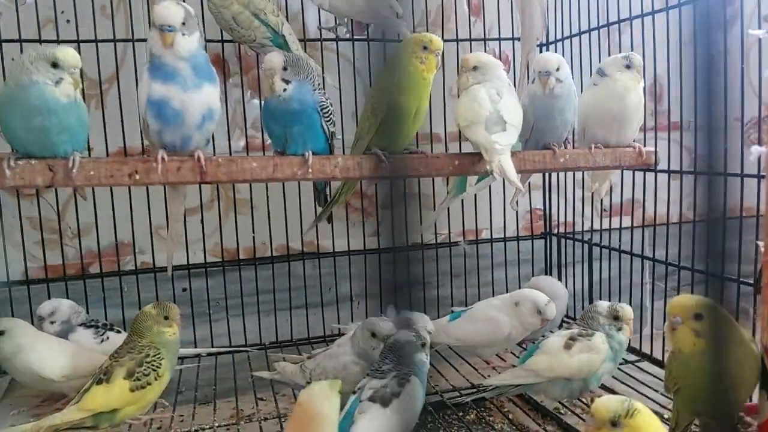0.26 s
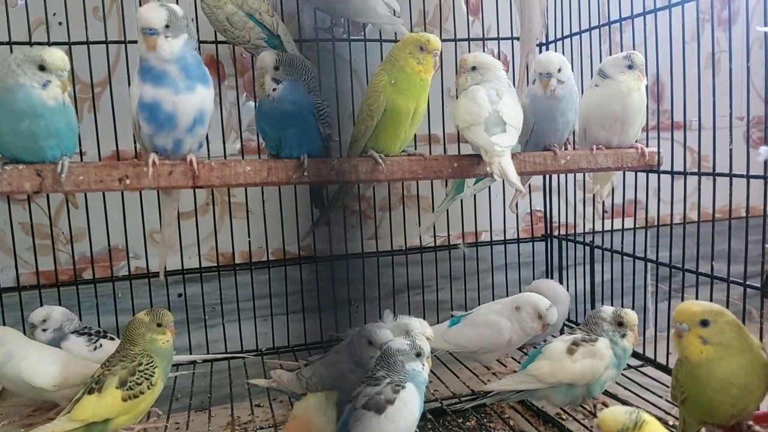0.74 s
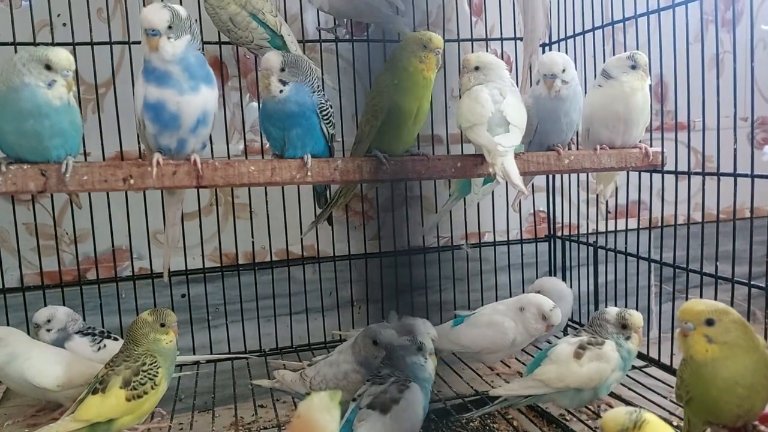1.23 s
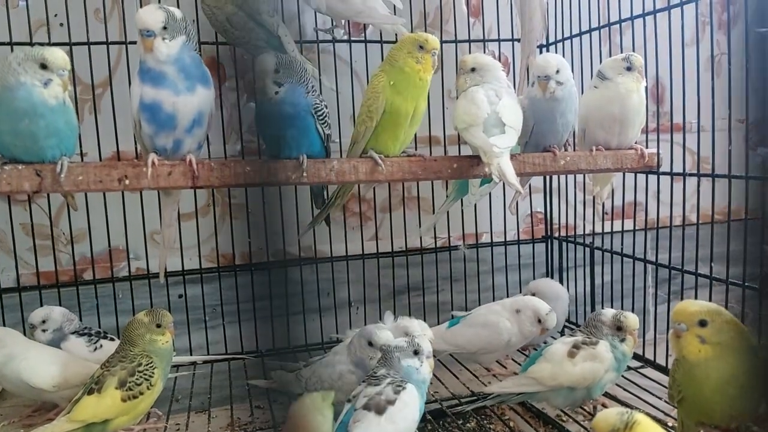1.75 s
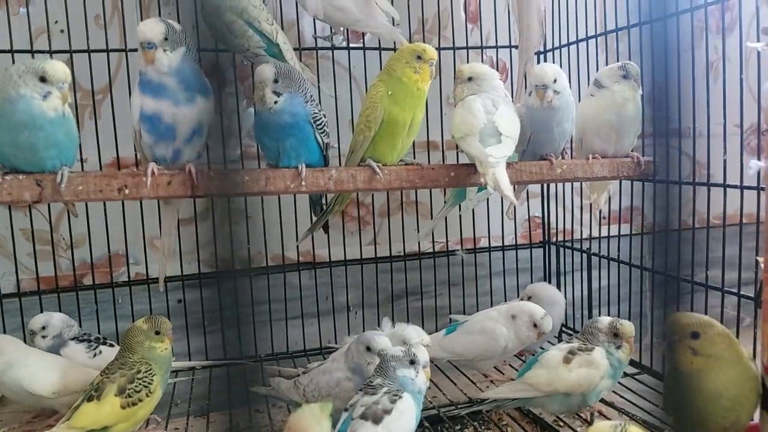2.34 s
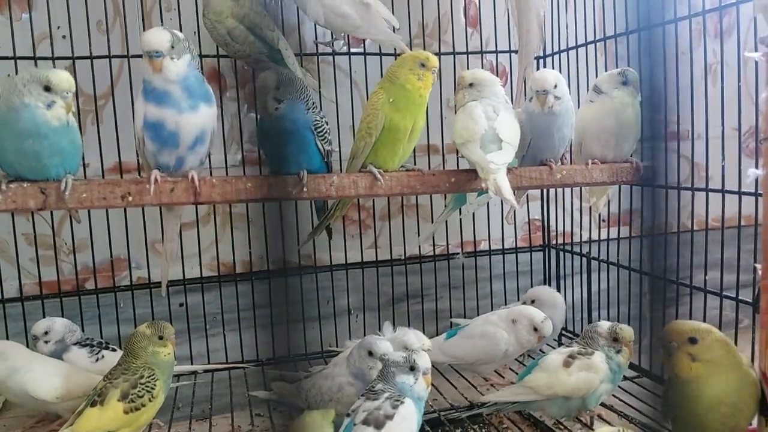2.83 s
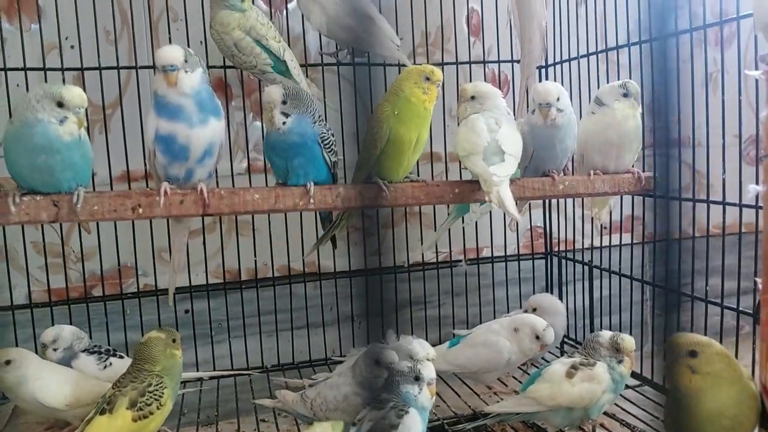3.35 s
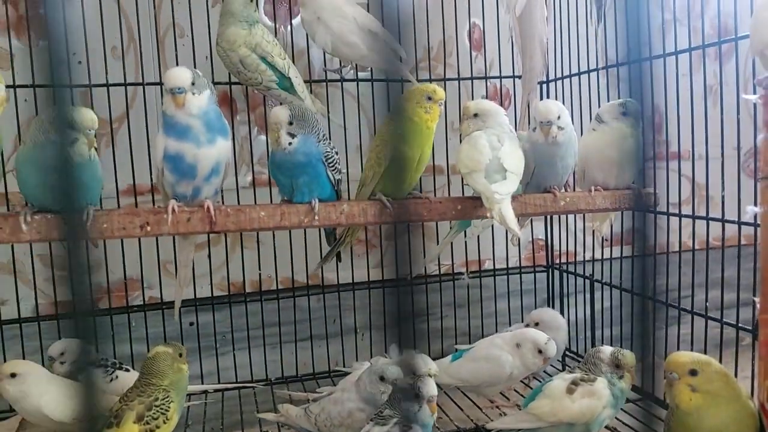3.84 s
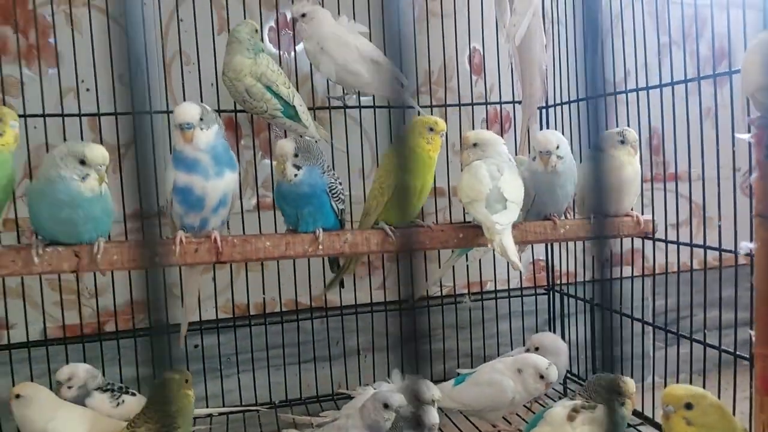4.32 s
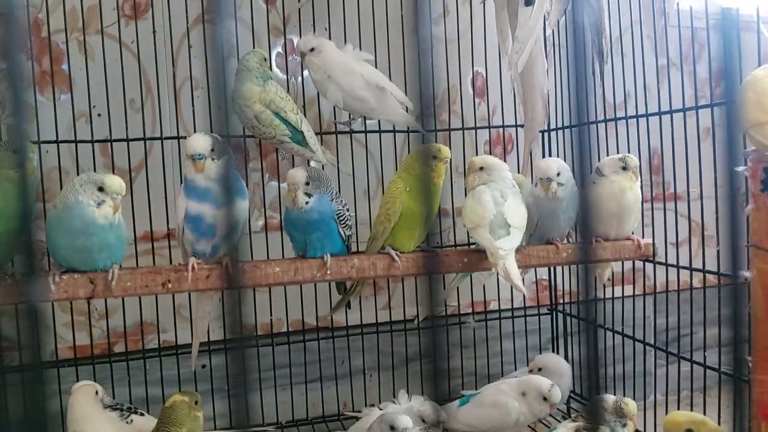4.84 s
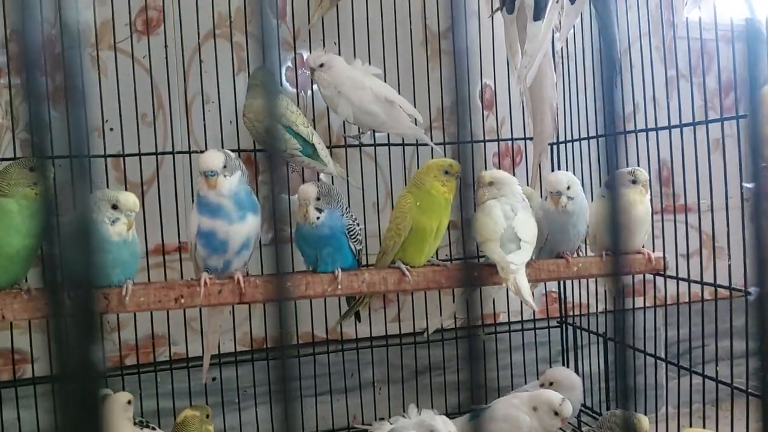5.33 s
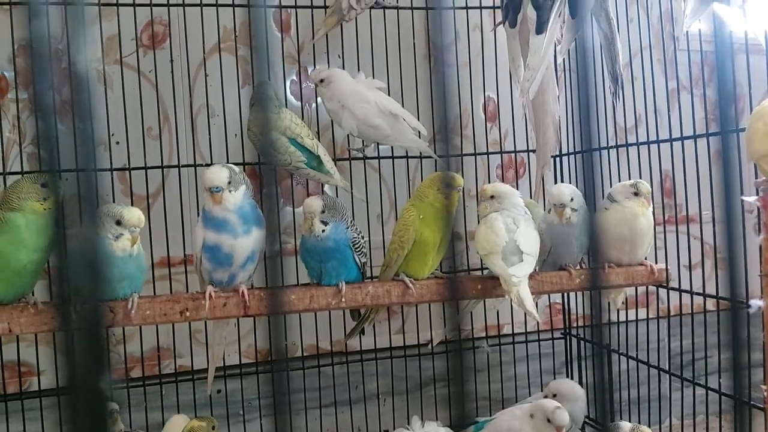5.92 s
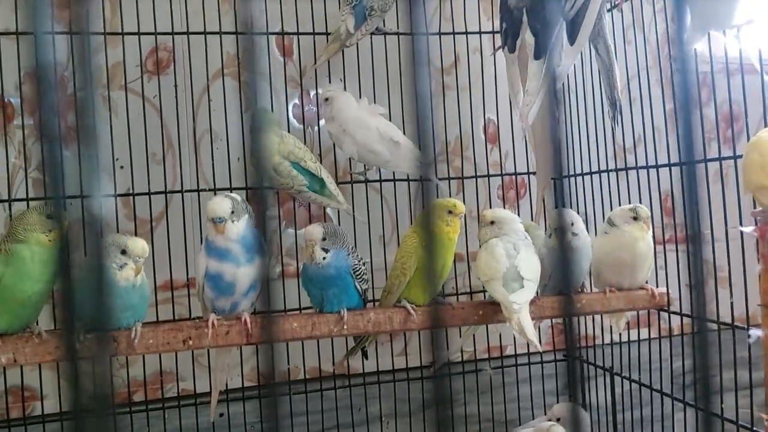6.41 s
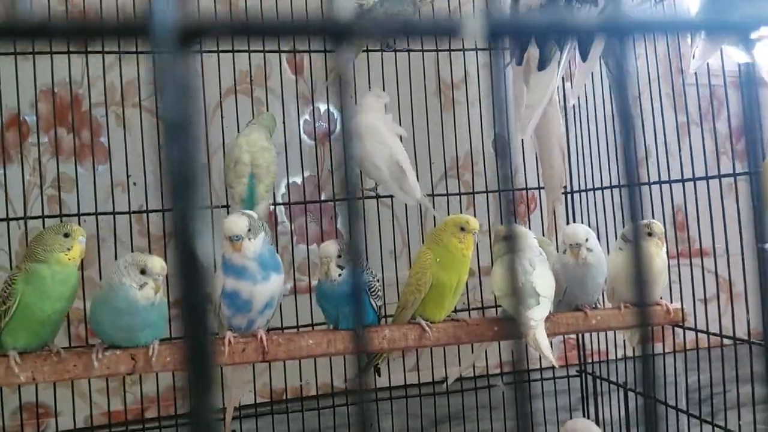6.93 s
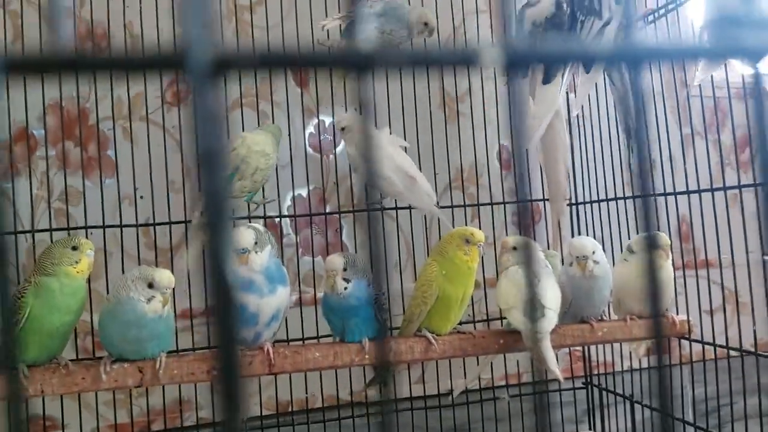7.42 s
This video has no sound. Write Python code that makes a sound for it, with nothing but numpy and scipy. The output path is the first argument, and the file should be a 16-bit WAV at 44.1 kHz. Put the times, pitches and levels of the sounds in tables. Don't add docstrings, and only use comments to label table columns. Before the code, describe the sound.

A small flock of parakeets indoors: sparse nasal calls, peeps and perch knocks, then bright close chirps, finishing with three piercing whistles.

```python
import sys
import numpy as np
from scipy import signal
from scipy.fft import rfft, irfft
from scipy.io import wavfile
from scipy.ndimage import uniform_filter1d, minimum_filter1d

SR = 44100
rng = np.random.default_rng(int(sys.argv[2]) if len(sys.argv) > 2 else 0)


def gain_from_db(level_db):
    decades = np.asarray(level_db, float) / 20
    return 10 ** decades


def transcribe(signal):
    frames = np.atleast_2d(signal).T
    limited = np.clip(frames, -1, 1)
    pcm = np.round(limited * 32767).astype(np.int16)
    wavfile.write(sys.argv[1], SR, pcm)


N = 338247
CUTOFF_HZ = 16400


def rms_one(x):
    return x / np.sqrt(np.mean(x ** 2) + 1e-20)


def at_hz(points, hz):
    table_hz, value = np.transpose(points)
    return np.interp(np.log(np.maximum(hz, 1)), np.log(table_hz), value)


def coloured(x, spectrum):
    size = x.shape[-1]
    gain = gain_from_db(at_hz(spectrum, np.fft.rfftfreq(size, 1 / SR)))
    return irfft(rfft(x) * gain, size)


def filtered(x, order, hz, kind):
    return signal.sosfilt(signal.butter(order, hz, kind, fs=SR, output="sos"), x)


def drift(hz):
    r = np.exp(-2 * np.pi * hz / SR)
    white = rng.standard_normal(N + SR)
    return rms_one(signal.lfilter([1], [1, -2 * r, r * r], white)[SR:])


def add_at(out, start_s, sound):
    at = round(start_s * SR)
    out[at:at + len(sound)] += sound[:N - at]


def bursts(times_s, peaks_db, lengths_s, rise_s):
    out, t = np.zeros(N), np.arange(SR // 2) / SR
    for start_s, db, length_s in zip(times_s, peaks_db, lengths_s):
        decay = np.exp(-t / max(length_s, 0.002))
        add_at(out, start_s, gain_from_db(db) * np.minimum(t / rise_s, 1) * decay)
    return out


def sing(notes, partials, wobble, flutter_db, flutter_hz, edge_s):
    out, waver = np.zeros(N), drift(flutter_hz)
    flutter = gain_from_db(flutter_db * drift(flutter_hz))
    air = rms_one(filtered(rng.standard_normal(N), 4, 2000, "high"))
    for rows in notes:
        s, *columns = np.transpose(rows)
        at = np.arange(max(int((s[0] - edge_s) * SR), 0), min(int((s[-1] + edge_s) * SR), N))
        t = at / SR
        hz, *levels_db = [np.interp(t, s, column) for column in columns]
        phase = 2 * np.pi * np.cumsum(hz * (1 + wobble * waver[at])) / SR
        stack, breath_db = partials(hz, *levels_db)
        tone = 0
        for k, db in stack:
            audible = k * hz < CUTOFF_HZ
            tone = tone + np.sqrt(2) * gain_from_db(db) * np.sin(k * phase + k * k) * audible
        edges = np.clip(np.minimum(t - s[0], s[-1] - t) / edge_s + 1, 0, 1) ** 2
        out[at] += edges * flutter[at] * (tone + gain_from_db(breath_db) * air[at])
    return out


def mottled(spectrum, lumps_db):
    shared, *own = rng.standard_normal((3, N))
    noise, out = coloured(0.58 * shared + np.array(own), spectrum), 0
    for low_hz in 25 * 2 ** np.arange(10):
        if at_hz(spectrum, 1.4 * low_hz) > -35:
            band = filtered(noise, 2, [low_hz, min(2 * low_hz, 20000)], "band")
            out = out + band * gain_from_db(lumps_db * drift(15.0))
    return rms_one(out)


def background():
    # frequency in Hz, level in dB per Hz.
    rumble_colour = [(12, -56), (20, -20.5), (59, 1), (173, -10.5), (242, 0), (387, -14.5), (449, -9.5),
                     (500, -17.5), (650, -53), (1100, -120)]
    rustle_colour = [(800, -47), (1400, -13.5), (2600, 2.5), (4200, 0.5), (5500, -10), (8000, -14),
                     (16000, -31)]
    stir_colour = [(300, -16), (500, -9), (1000, -7.5), (1600, -10.5), (2500, -17.5)]
    # time in seconds, level in dB.
    restless = [(0.0, -44.5), (0.45, -44.5), (0.7, -75), (1.52, -65.5), (2.4, -67.5), (2.65, -89),
                (2.8, -66.5), (3.35, -63), (4.31, -58.5), (4.59, -74), (4.78, -56), (5.5, -65.5),
                (6.15, -60.5), (6.34, -47), (6.9, -52), (7.24, -65), (7.67, -68)]
    # start in seconds, length in seconds, level in dB.
    shuffles = [
        (-.2, 0.73, -57),
        (1.3, 1.2, -73),
        (3.1, 1.27, -66.5),
        (5.0, 1.8, -67),
    ]
    rumble_db, stir_db, shuffle_edge_s = -68, -74.5, 0.06
    stops_s, fade_s, drop_db = 6.85, 0.27, -13
    t = np.arange(N) / SR
    fade_db = drop_db * np.clip((t - stops_s) / fade_s, 0, 1)
    rumble = gain_from_db(rumble_db + fade_db) * mottled(rumble_colour, lumps_db=4.5)
    stir_level = gain_from_db(stir_db + fade_db)
    for s, length_s, db in shuffles:
        inside_s = np.minimum(t - s, s + length_s - t)
        stir_level = stir_level + gain_from_db(db) * np.clip(inside_s / shuffle_edge_s + 1, 0, 1)
    stir = stir_level * mottled(stir_colour, lumps_db=4.0)
    rustle = gain_from_db(np.interp(t, *np.transpose(restless))) * mottled(rustle_colour, lumps_db=1.5)
    return (rumble + stir + rustle) * gain_from_db([[1.2], [4.8]])


def bleat_shape(s, length_s, hz, sag_hz_per_s, db, scoop_share):
    scoop_s, droop_share = 0.018, 0.98
    attack_s, attack_db, release_s, release_db = 0.017, -21, 0.03, -6.5
    t = np.arange(0, length_s, 0.004)
    going = np.clip(1 - (length_s - t) / release_s, 0, 1)
    scoop = 1 - (1 - scoop_share) * np.exp(-t / scoop_s)
    pitch_hz = (hz - sag_hz_per_s * t) * scoop * (1 - (1 - droop_share) * going)
    level_db = db + attack_db * np.clip(1 - t / attack_s, 0, 1) + release_db * going
    return np.transpose([s + t, pitch_hz, level_db])


def throaty(calls, throat, scoop_share):
    def partials(hz, db):
        stack = [(k, db + at_hz(throat, k * hz) - at_hz(throat, 2345)) for k in range(1, 26)]
        return stack, db - 13.5
    notes = [bleat_shape(*row, scoop_share) for row in calls]
    return sing(notes, partials, wobble=0.005, flutter_db=2.5, flutter_hz=40, edge_s=0.012)


def bleats():
    # start in seconds, length in seconds, pitch in Hz, sag in Hz per second, level in dB.
    calls = [(-.06, 0.18, 618.6, 150.5, -45.5), (.595, 0.1, 611, 264, -57.5), (.89, 0.17, 568.3, 94, -61),
             (1.03, .18, 578.6, -11, -55), (1.23, 0.095, 590.6, 8, -59.5), (1.68, 0.095, 586, 5, -62),
             (2.985, 0.21, 594.6, 19.5, -52), (3.595, 0.2, 595.7, 3, -51), (4.16, 0.24, 599.4, 19.5, -50.5),
             (5.0, 0.19, 598, 53, -49), (5.19, 0.11, 590, 6, -52.5), (7.44, 0.25, 584, -31, -75)]
    # frequency in Hz, gain in dB.
    throat = [(290, -42.5), (500, -35), (1190, -17.5), (1430, -20), (2330, -3.5), (2640, -17.5), (2920, -3),
              (4800, -7.5), (5860, -28.5), (9250, -32), (13200, -27), (15000, -41)]
    return throaty(calls, throat, scoop_share=0.73)


def chirp_shape(s, leap_s, opening_db, closing_db, octave_db, drops):
    end_s, drop_at_s, drop_s, jump_s = 0.038, 0.021, 0.006, 0.0026
    top_hz, settle_hz, drop_hz = 6910, 6300, 4792
    before_drop_db, low_octave_db, half_off_db = -18, -16.5, -45
    burst_s, climb_s = 0.5 * leap_s, 0.65 * leap_s
    jump_at_s = max(leap_s - jump_s, climb_s + 0.00085)
    # s, Hz, level dB, half-register dB, octave dB
    rows = [(0, 4915, opening_db - 16.5, -3.5, low_octave_db),
            (burst_s, 4546, opening_db - 6, -9, low_octave_db),
            (climb_s, 4989, opening_db, -18, low_octave_db),
            (jump_at_s, 5500, opening_db - 10, -18, octave_db)]
    if opening_db < -28:
        rows = [(t, hz, db, half_off_db, octave_db) for t, hz, db, *_ in rows]
    if drops:
        half_db = half_off_db
        clear = [(leap_s, top_hz, before_drop_db), (drop_at_s, top_hz, before_drop_db),
                 (drop_at_s + drop_s, drop_hz, 0), (end_s, drop_hz, 0)]
    else:
        half_db = -30.5
        clear = [(leap_s, top_hz, 0), (end_s, settle_hz, 0)]
    rows += [(t, hz, closing_db + db, half_db, octave_db) for t, hz, db in clear]
    return np.array(rows) + [s, 0, 0, 0, 0]


def chirps():
    # start in seconds, leap in seconds after it, opening, closing and octave levels in dB.
    high = [
        (-0.012, 0.033, -16, -22.5, -24),
        (4.604, 0.02, -13, -24.5, -0.5),
        (5.005, 0.02, -9, -21, -12),
        (5.559, 0.022, -17, -22.5, -4),
        (5.665, 0.02, -20.5, -25.5, -9),
        (6.159, 0.021, -19, -23, -10.5),
    ]
    dropping = [
        (0.335, 0.022, -15, -17.5, -16),
        (4.028, 0.011, -28, -19, -8.5),
    ]

    def partials(hz, db, half_db, octave_db):
        whole = [(1, db), (2, db + octave_db), (3, db + octave_db - 7.5)]
        halves = [(0.5, db + half_db), (1.5, db + half_db - 6.0), (2.5, db + half_db - 1)]
        return whole + halves, db + half_db + 2.5
    notes = [chirp_shape(*row, drops=False) for row in high]
    notes += [chirp_shape(*row, drops=True) for row in dropping]
    voice = sing(notes, partials, wobble=0.013, flutter_db=4.5, flutter_hz=403, edge_s=0.0015)
    return filtered(voice, 6, 1910, "high")


def squawks():
    # start in seconds, length in seconds, pitch in Hz, sag in Hz per second, level in dB.
    calls = [
        (.2, .135, 898, 763, -51),
        (3.265, .16, 893.4, 854, -51),
        (4.81, .17, 873.5, 485, -53),
    ]
    # frequency in Hz, gain in dB.
    throat = [(410, -45), (700, -22.5), (2000, -4), (2460, 2), (2800, -10.5), (3300, 4.5), (3710, 3.5),
              (4160, -1.5), (6270, -22), (15000, -46.5)]
    return throaty(calls, throat, scoop_share=1)


def pure_tones(notes):
    upper_levels_db = [-11.5, -21.5, -16.5]

    def partials(hz, db):
        low_db = np.where(hz < 2500, 0, -18)
        upper = [(k, db + upper_db + low_db) for k, upper_db in enumerate(upper_levels_db, 2)]
        return [(1, db)] + upper, db - 43.5
    return sing(notes, partials, wobble=0.003, flutter_db=0.6, flutter_hz=120, edge_s=0.004)


def glide_shape(s, length_s, first_hz, last_hz, db):
    attack_share, edge_db = 0.09, -1
    shares = np.array([0, attack_share, 1 - attack_share, 1])
    level_db = db + edge_db * np.array([1, 0, 0, 1])
    return np.transpose([s + shares * length_s, first_hz + shares * (last_hz - first_hz), level_db])


def gliding_peeps():
    # start in seconds, length in seconds, first pitch in Hz, last pitch in Hz, level in dB.
    glides = [(0.385, 0.08, 1340, 1550, -50), (0.609, 0.091, 1462, 1573, -48.5),
              (0.686, 0.0151, 1570, 1390, -50), (5.401, 0.035, 1440, 1304, -57),
              (5.458, .09, 1340, 1152, -66), (5.732, 0.042, 1900, 1660, -51.5),
              (5.797, 0.049, 1396, 1088, -56), (5.858, 0.0064, 2197, 1620, -43.5),
              (5.872, 0.041, 2142, 1750, -43), (7.259, 0.008, 1753, 1604, -52),
              (7.29, .02, 1650, 1710, -68.5), (7.537, .015, 1698, 1720, -64)]
    return pure_tones([glide_shape(*row) for row in glides])


def thumps():
    # start in seconds, peak in dB, length in seconds.
    lumps = [(0.406, -52, 0.028), (1.335, -50, 0.035), (4.627, -38.5, 0.012), (5.011, -41, 0.058),
             (5.579, -28.5, 0.017), (5.68, -33, 0.014), (6.174, -38, 0.027), (6.307, -37, 0.026),
             (6.373, -39, 0.018), (6.612, -38.5, 0.039), (6.681, -42.5, 0.02), (6.911, -42.5, 0.052),
             (6.976, -36, 0.02)]
    s, db, length_s = np.transpose(lumps)
    air = filtered(rng.standard_normal((2, N)), 2, [35, 260], "band")
    return bursts(s, db, length_s, rise_s=0.011) * rms_one(air) * gain_from_db([[1.5], [-1.5]])


def knocks():
    # start in seconds, peak in dB, ring in Hz.
    blows = [(0.465, -47.5, 456), (0.788, -43, 375), (0.897, -48.5, 455), (1.356, -40.5, 247),
             (1.499, -46, 258), (1.599, -44.5, 255), (1.774, -46.5, 222), (2.059, -52, 430),
             (2.178, -41.5, 289), (2.289, -41.5, 461), (2.399, -48.5, 846), (2.754, -58, 257),
             (3.229, -50, 435), (7.532, -65, 1360), (7.602, -60, 1270)]
    out, t = np.zeros(N), np.arange(SR // 5) / SR
    for s, db, hz in blows:
        mode = np.sin(2 * np.pi * hz * t) * np.exp(-t / 0.011)
        overtone = 0.13 * np.sin(2 * np.pi * 1.6 * hz * t) * np.exp(-t / 0.0037)
        add_at(out, s, gain_from_db(db) * (mode + overtone))
    return out


def hops():
    # start in seconds, peak in dB, length in seconds, bright tick in dB re peak.
    landings = [(0.693, -34, 0.02, -35), (0.887, -36.5, 0.13, -46), (1.353, -32.5, 0.037, -30),
                (1.576, -57, 0.022, -30), (1.59, -41.5, 0.13, -32), (1.742, -37.5, 0.024, -11),
                (1.754, -25.5, 0.017, -9.5), (2.155, -29, 0.053, -27), (2.402, -33, 0.022, 7),
                (2.749, -38, 0.053, 4), (3.315, -33.5, 0.19, -7), (3.717, -34.5, 0.054, 1.5),
                (3.867, -24.5, 0.027, -19), (5.943, -42.5, 0.033, -16), (7.598, -44.5, 0.047, -33)]
    # frequency in Hz, level in dB per Hz.
    scratch_colour = [(400, -12), (900, -7), (2000, -1.5), (4500, -6.5), (8000, -23)]
    s, db, length_s, bright_db = np.transpose(landings)
    grains = rng.standard_normal(N) * gain_from_db(2.5 * drift(300))
    tick = rms_one(filtered(grains, 3, 9000, "high"))
    scratch = rms_one(coloured(grains, scratch_colour))
    scratches = bursts(s, db, length_s, rise_s=0.019) * scratch
    return scratches + bursts(s, db + bright_db, 0.4 * length_s, rise_s=0.001) * tick


def arch_shape(s, fall_s, length_s, last_hz, db):
    foot_hz, top_hz, rise_s, fall_hz_per_s = 4770, 5950, 0.026, 48000
    foot_db, top_db, end_db = -19.5, -9.5, -16.5
    landed_s = min(fall_s + (top_hz - last_hz) / fall_hz_per_s, length_s - 0.002)
    rows = [(0, foot_hz, foot_db), (rise_s, top_hz, top_db), (fall_s, top_hz, top_db),
            (landed_s, last_hz, 0), ((landed_s + length_s) / 2, last_hz, 0), (length_s, last_hz, end_db)]
    return np.array(rows) + [s, 0, db]


def arched_peeps():
    # start in seconds, fall in seconds after it, length in seconds, last pitch in Hz, level in dB.
    arches = [
        (1.214, 0.045, .05, 5400, -48),
        (1.26, 0.042, 0.056, 5470, -49.5),
        (1.469, .047, 0.1, 4423, -35.5),
        (2.185, 0.074, 0.097, 5233, -38),
    ]
    return pure_tones([arch_shape(*row) for row in arches])


def pecks():
    levels_db = [
        -44,
        -47.5,
        -43.5,
        -46.5,
        -46.5,
        -45.5,
        -46,
    ]
    # frequency in Hz, level in dB, T60 in seconds.
    tray = [(600, -5, .07), (720, -4, .07), (810, 0, .11), (900, -3, .08), (970, -2, .09), (1180, -9, .06)]
    first_s, gap_s = 3.385, 0.1665
    out, t = np.zeros(N), np.arange(SR // 4) / SR
    chance = rng.standard_normal((len(levels_db), 2, len(tray)))
    for k, db in enumerate(levels_db):
        ring = 0
        for (hz, mode_db, t60_s), strength, detune in zip(tray, *chance[k]):
            decay = gain_from_db(mode_db + 3.8 * strength - 60 * t / t60_s)
            ring = ring + decay * np.sin(2 * np.pi * hz * (1 + 0.051 * detune) * t)
        add_at(out, first_s + k * gap_s, gain_from_db(db) * ring * np.minimum(t / 0.0019, 1))
    return out


def whistle_shape(s, length_s, top_hz, hold_s, db):
    # time in seconds, share of top pitch, first, second and fourth partial in dB.
    rise = [
        (0, 0.246, -35.5, -36.5, -28.5),
        (0.016, 0.518, -30, -21.5, -19),
        (0.024, .88, -19.5, -7, -20.5),
        (.048, 1.006, -19, -9, -25.5),
    ]
    # seconds before the end, share of sagged pitch, first, second and fourth partial in dB.
    fall = [
        (.08, 0.97, -14.5, -2.5, -18),
        (.04, 0.97, -19.5, 1, -22.5),
        (.019, .92, -30.5, -10.5, -21.5),
        (0.0066, .79, -28.5, -18.5, -59),
    ]
    # First, second and fourth partial in dB as the hold ends.
    held_db = [-25, -6.5, -15]
    sag_hz_per_s = 4300
    held_s = rise[-1][0] + hold_s
    rows = [(t, share * top_hz, *levels) for t, share, *levels in rise]
    rows += [(held_s, 0.985 * top_hz, *held_db)]
    for before_end_s, share, *levels in fall:
        t = length_s - before_end_s
        rows += [(t, share * (top_hz - sag_hz_per_s * (t - held_s)), *levels)]
    return np.array(rows) + [s, 0, db, db, db]


def whistles():
    # start in seconds, length in seconds, top pitch in Hz, hold in seconds, level in dB.
    calls = [
        (6.212, .21, 2241, .035, -9),
        (6.542, 0.19, 2253, .012, -8.5),
        (6.849, 0.19, 2225, .02, -10),
    ]

    def partials(hz, first_db, second_db, fourth_db):
        lower = [(1, first_db), (2, second_db), (3, (second_db + fourth_db) / 2 - 15.5)]
        upper = [(k, fourth_db - 4.2 * (k - 4)) for k in range(4, 12)]
        return lower + upper, fourth_db - 17
    notes = [whistle_shape(*row) for row in calls]
    return sing(notes, partials, wobble=0.0062, flutter_db=1.5, flutter_hz=214, edge_s=0.004)


def heard(x, direct_db, room_db, pan_db, lag_s):
    # frequency in Hz, T60 in seconds.
    room_t60 = [(200, 0.72), (1500, 0.39), (4000, 0.39), (8000, 0.4), (14000, 0.32)]
    # frequency in Hz, gain in dB.
    room_colour = [(1000, 2.3), (5000, 0.45), (9000, 7), (14000, -11)]
    t = np.arange(int(0.7 * SR)) / SR
    lows_hz = 60 * 2.0 ** np.arange(8)
    highs_hz = 2 * lows_hz
    highs_hz[-1] *= 1.2
    tail, white = 0, rng.standard_normal((2, len(t)))
    for low_hz, high_hz in zip(lows_hz, highs_hz):
        band = filtered(white, 2, [low_hz, high_hz], "band")
        tail = tail + band * gain_from_db(-60 * t / at_hz(room_t60, np.sqrt(low_hz * high_hz)))
    tail = tail * np.clip((t - 0.002) / 0.0008, 0, 1)
    tail = tail / np.sqrt(np.sum(tail ** 2, axis=1, keepdims=True))
    tail = coloured(tail, room_colour)
    late = np.interp(np.arange(N) - lag_s * SR, np.arange(N), x)
    direct = gain_from_db(direct_db) * np.array([late, x])
    room = gain_from_db(room_db) * signal.fftconvolve(x[None], tail, axes=1)[:, :N]
    return (direct + room) * gain_from_db([[pan_db / 2], [-pan_db / 2]])


def scene():
    far = heard(bleats() + squawks(), direct_db=1.5, room_db=0.5, pan_db=-5.5, lag_s=0.00018)
    near = heard(chirps(), direct_db=3.5, room_db=0.5, pan_db=-6.5, lag_s=0.0002986)
    glider = heard(gliding_peeps(), direct_db=5, room_db=-5, pan_db=-5.0, lag_s=-0.00019)
    contacts = gain_from_db(3) * knocks() + gain_from_db(-11.0) * hops() + pecks()
    cage = heard(contacts, direct_db=-3, room_db=-3.5, pan_db=-2.5, lag_s=0.0001)
    peeper = heard(arched_peeps(), direct_db=1.5, room_db=2.0, pan_db=-5.5, lag_s=-0.00021)
    whistler = heard(whistles(), direct_db=-1.0, room_db=1.0, pan_db=-3.5, lag_s=-0.0004156)
    return near + whistler + peeper + glider + far + cage + thumps() + background()


def roll_off(x):
    return signal.sosfilt(signal.butter(12, 16500, fs=SR, output="sos"), x)


def record(dry):
    # frequency in Hz, gain in dB.
    microphone = [(1000, -0.25), (7400, 0.43), (8400, -3), (9400, -4.5), (13500, 3.4), (15000, 1),
                  (16000, -11)]
    x = coloured(dry, microphone)
    limit = np.minimum(1, 0.98 / (np.abs(x).max(axis=0) + 1e-9))
    x = x * uniform_filter1d(minimum_filter1d(limit, size=257), size=129)
    x = signal.sosfilt(signal.cheby2(12, 70, CUTOFF_HZ, fs=SR, output="sos"), x)
    return roll_off(x)


dry = scene()
out = record(dry)
transcribe(out)
```